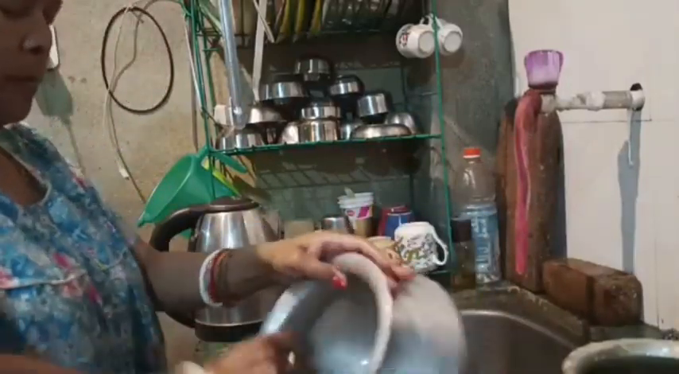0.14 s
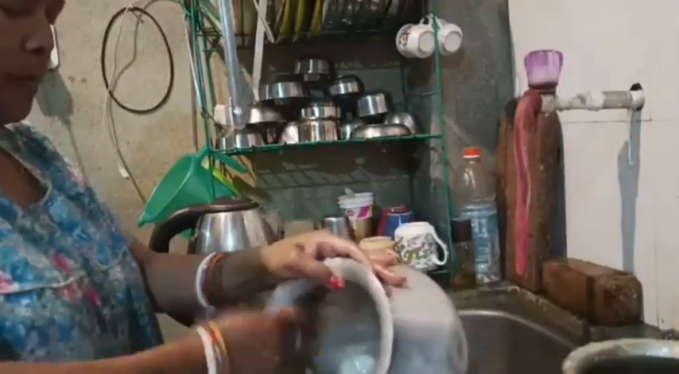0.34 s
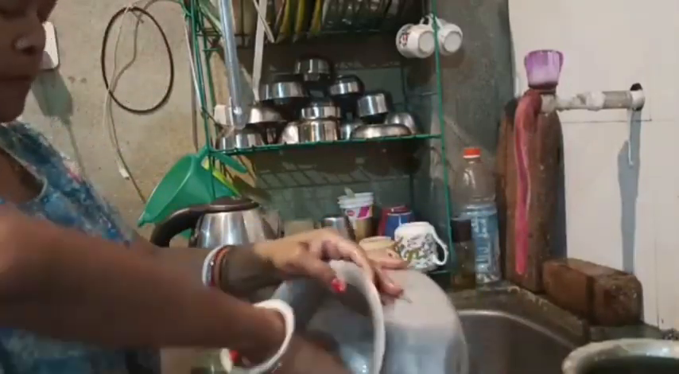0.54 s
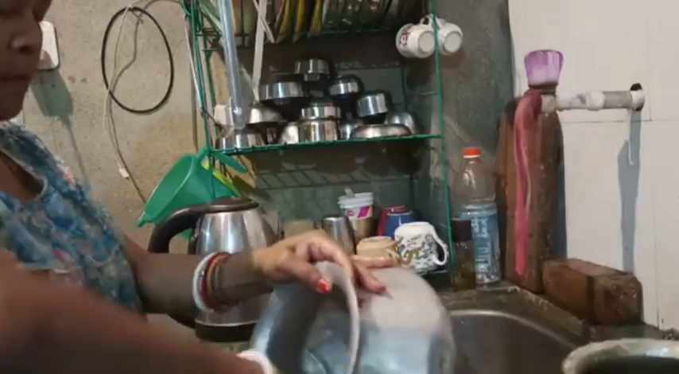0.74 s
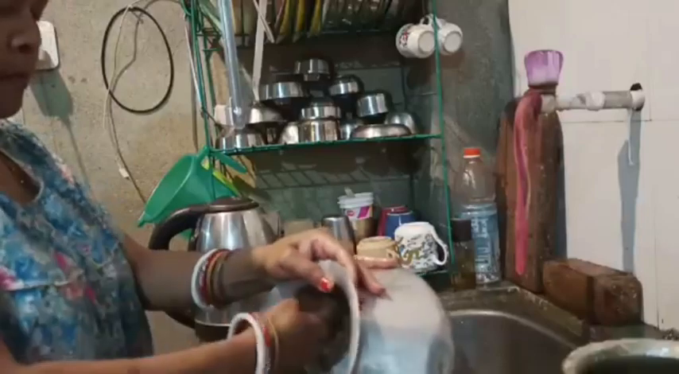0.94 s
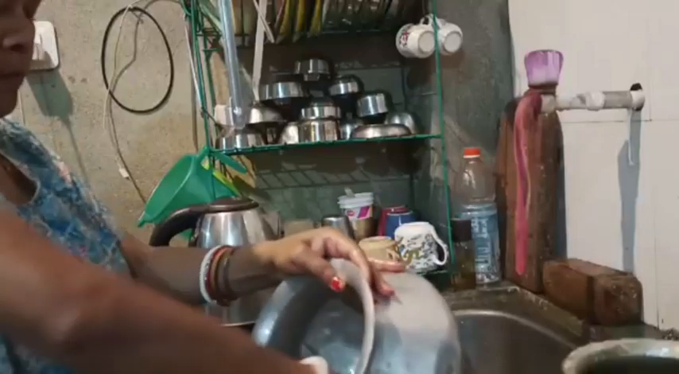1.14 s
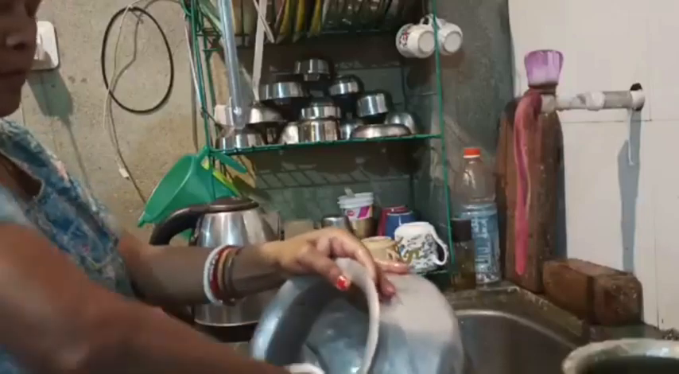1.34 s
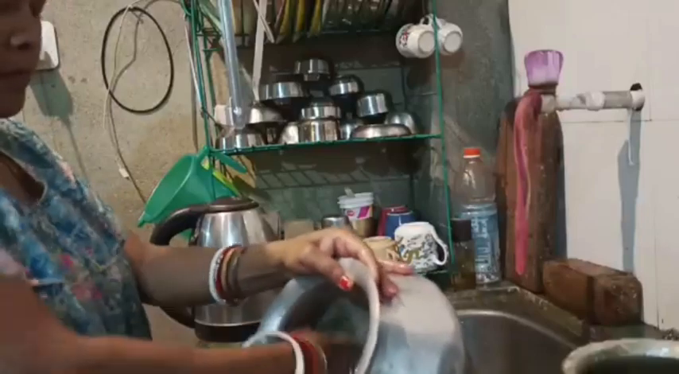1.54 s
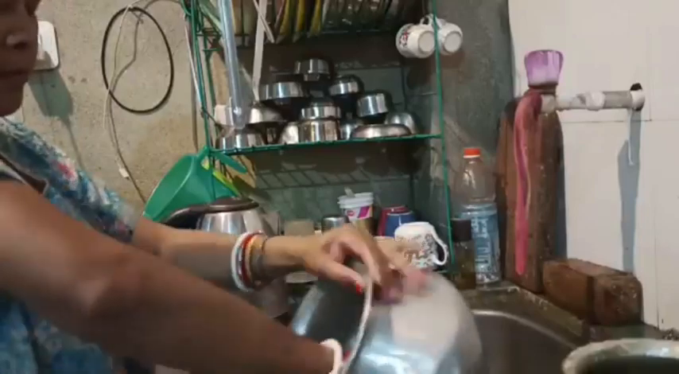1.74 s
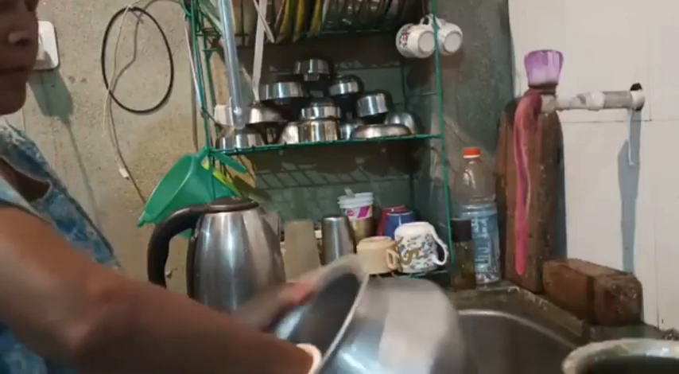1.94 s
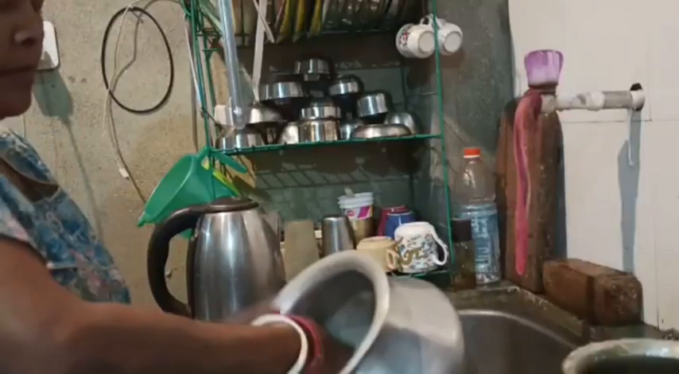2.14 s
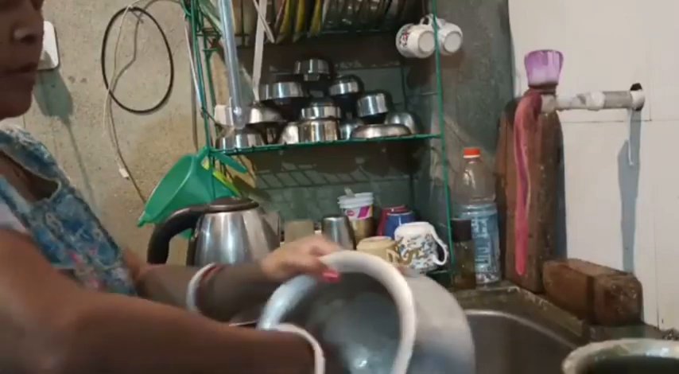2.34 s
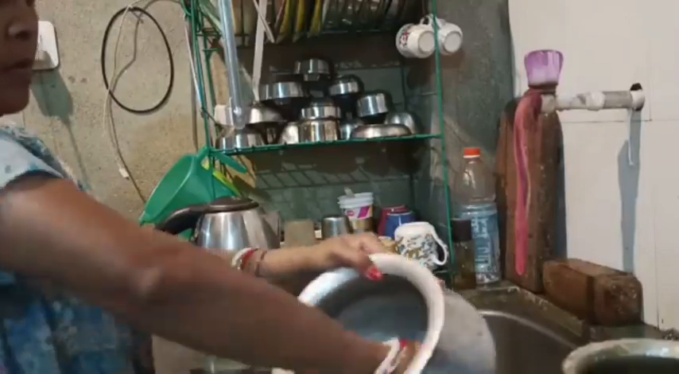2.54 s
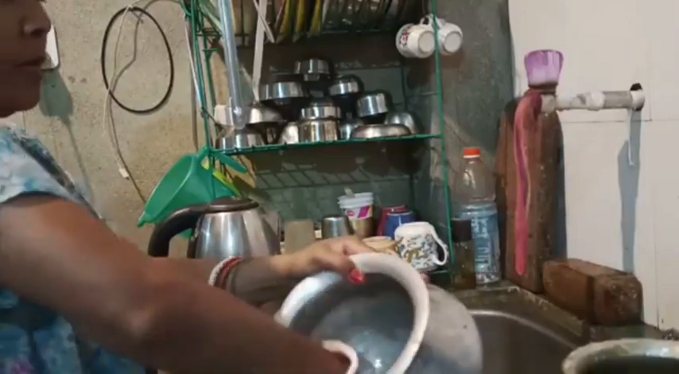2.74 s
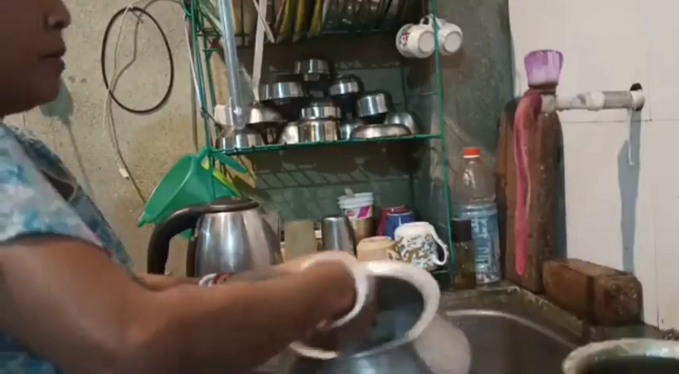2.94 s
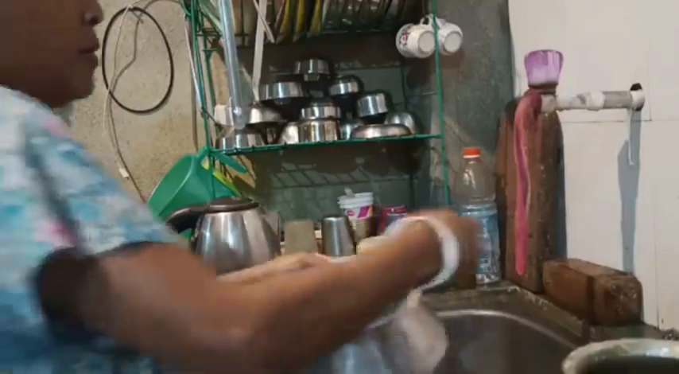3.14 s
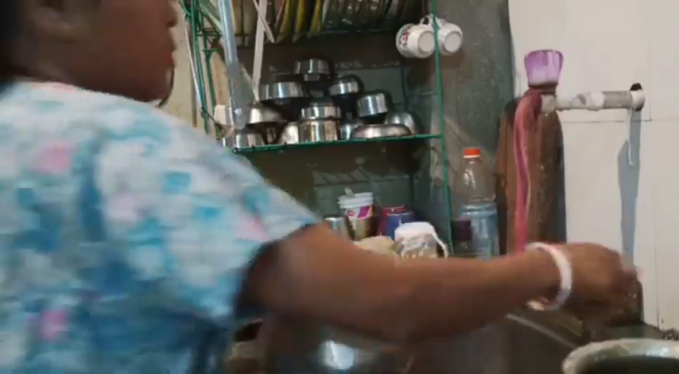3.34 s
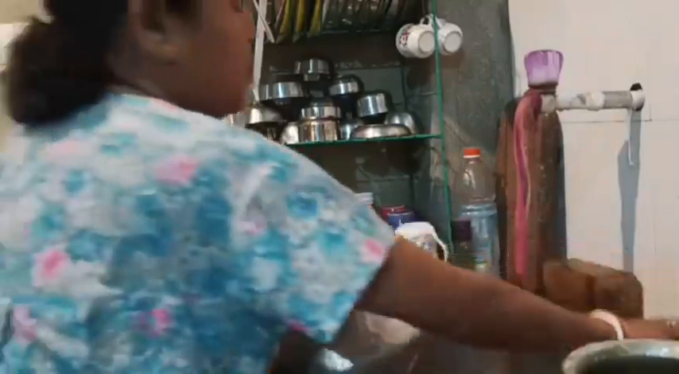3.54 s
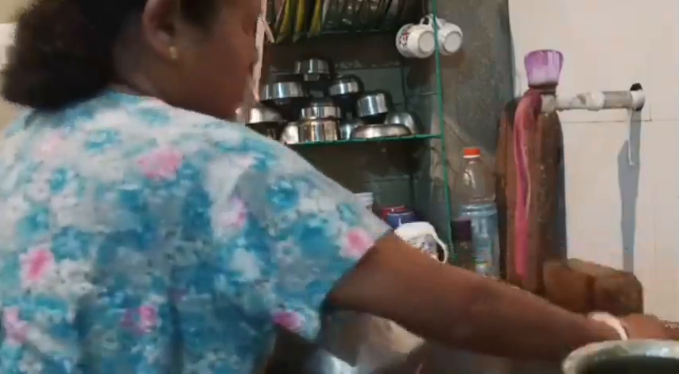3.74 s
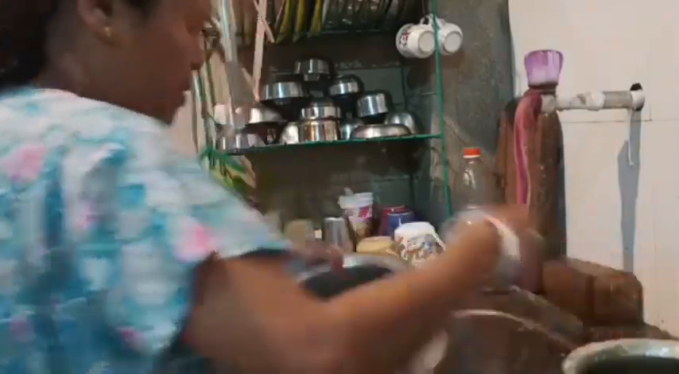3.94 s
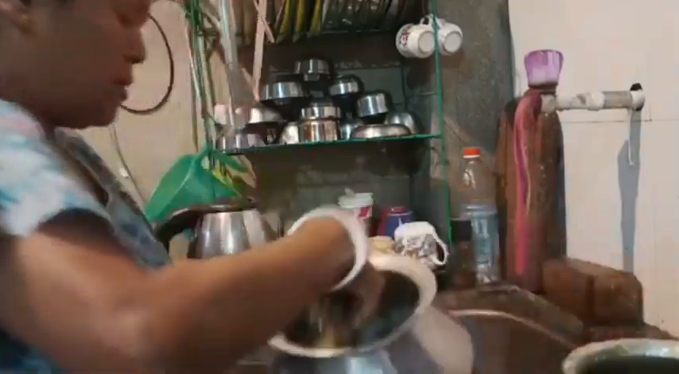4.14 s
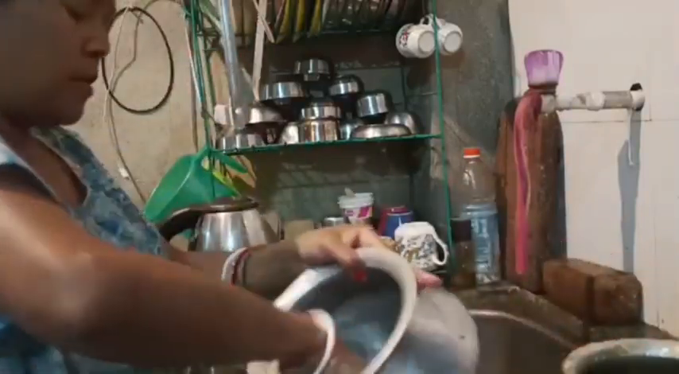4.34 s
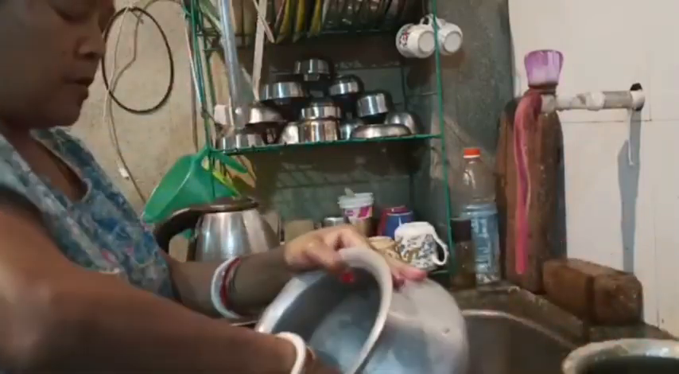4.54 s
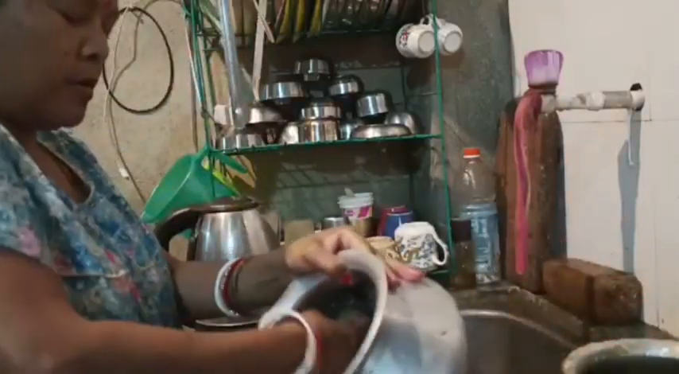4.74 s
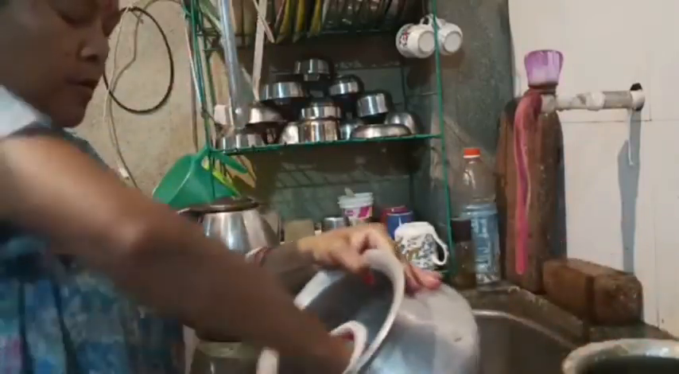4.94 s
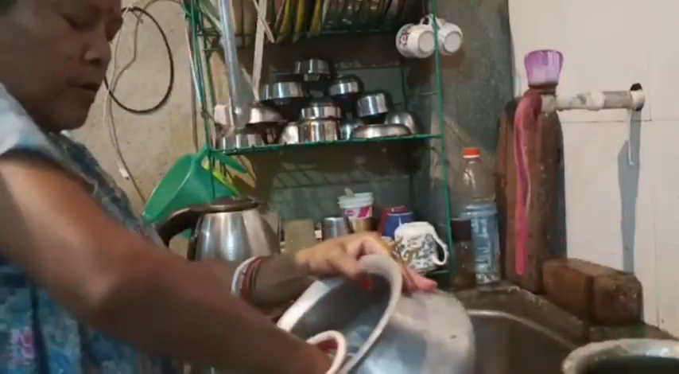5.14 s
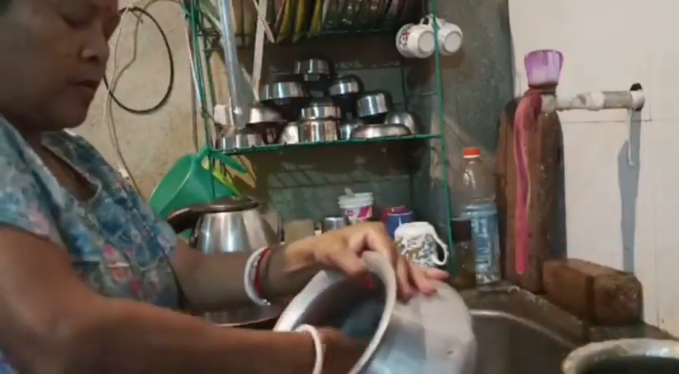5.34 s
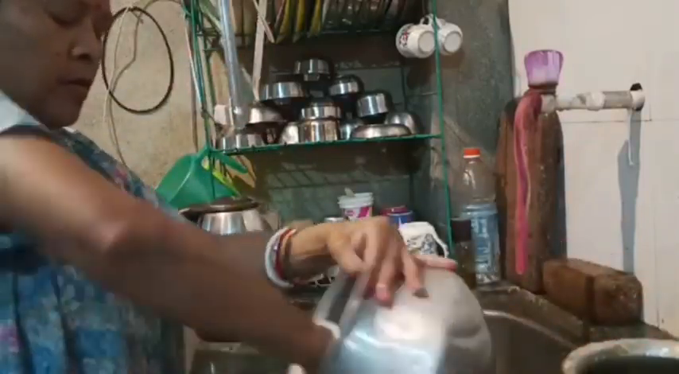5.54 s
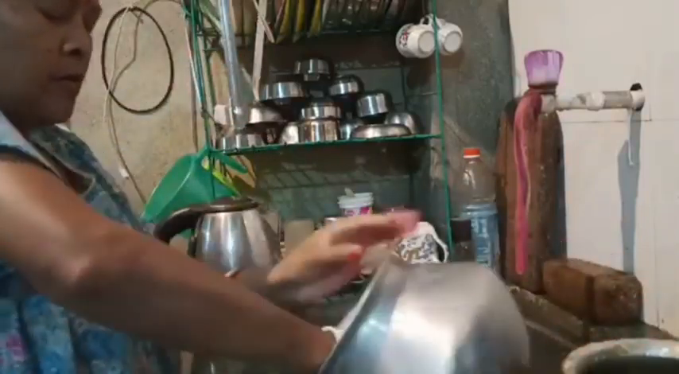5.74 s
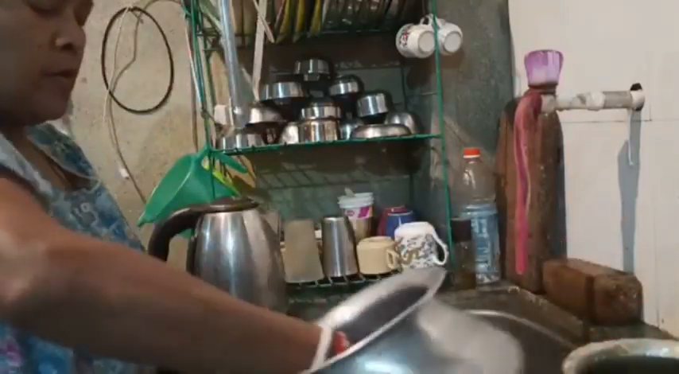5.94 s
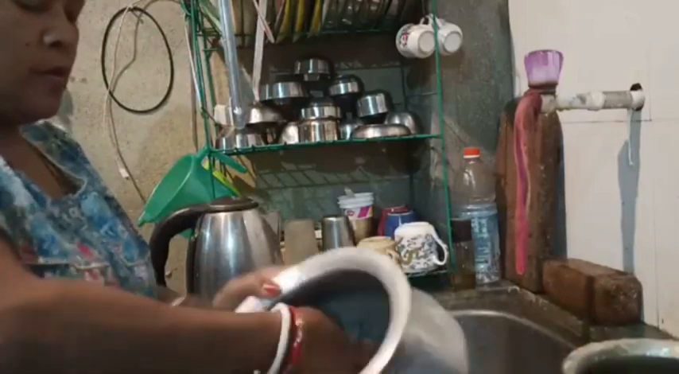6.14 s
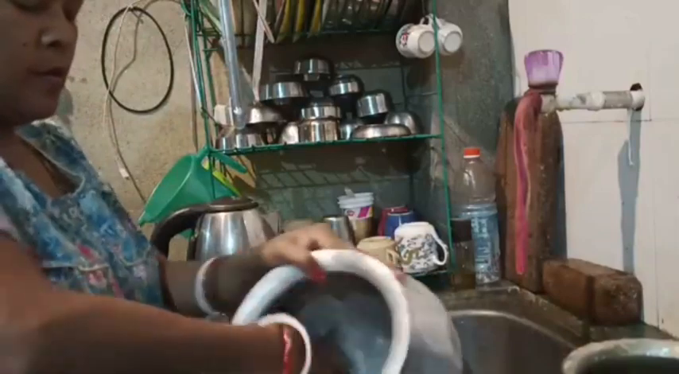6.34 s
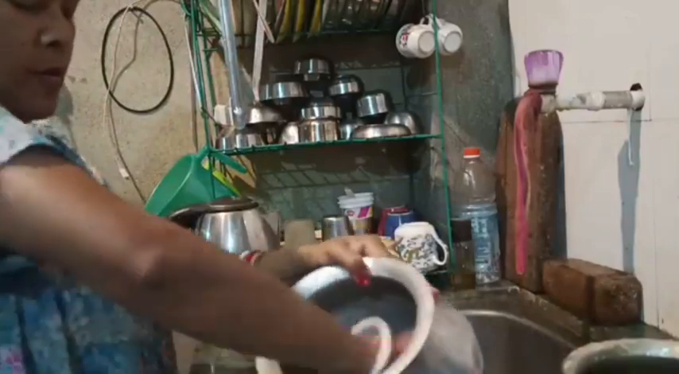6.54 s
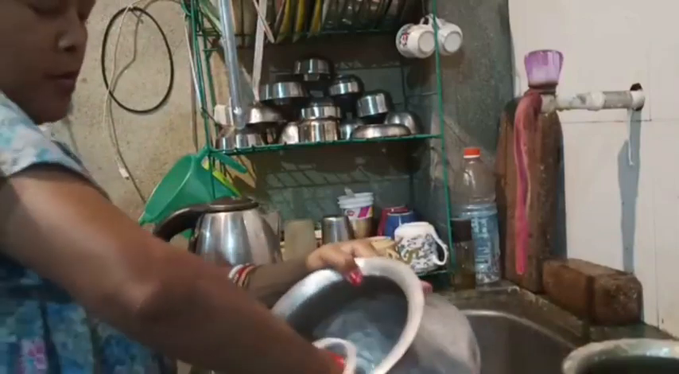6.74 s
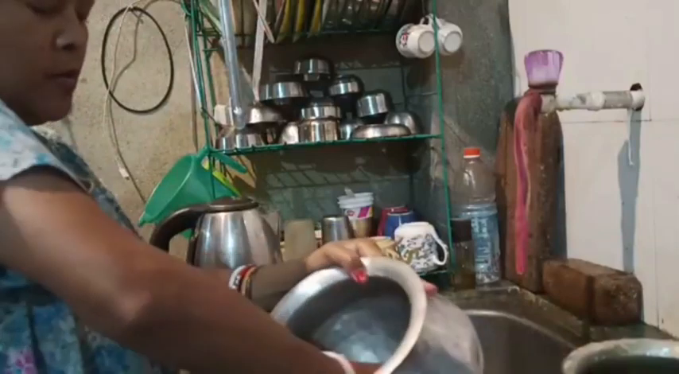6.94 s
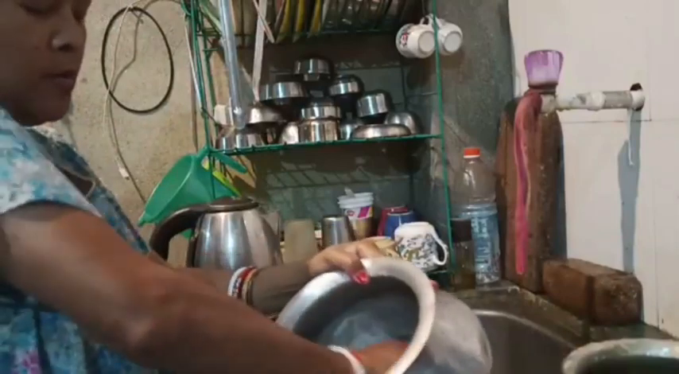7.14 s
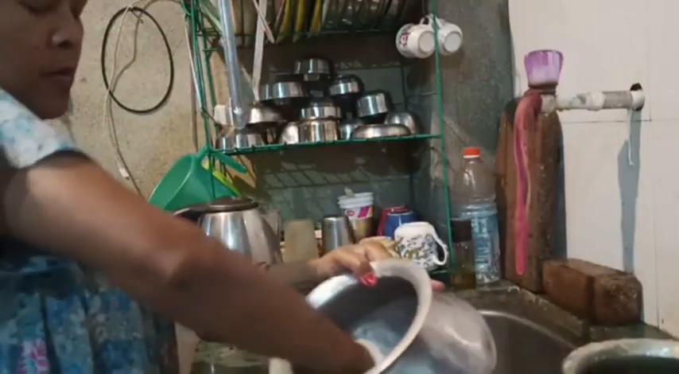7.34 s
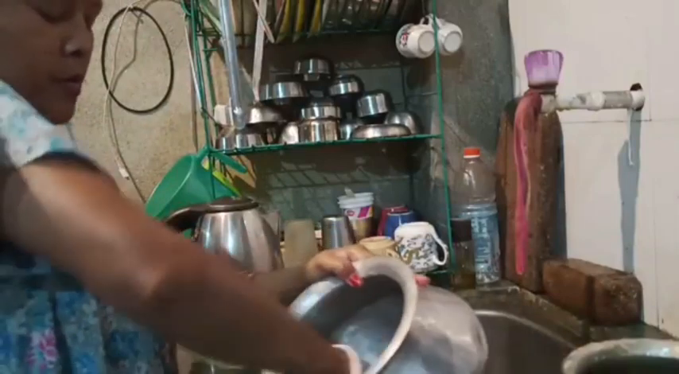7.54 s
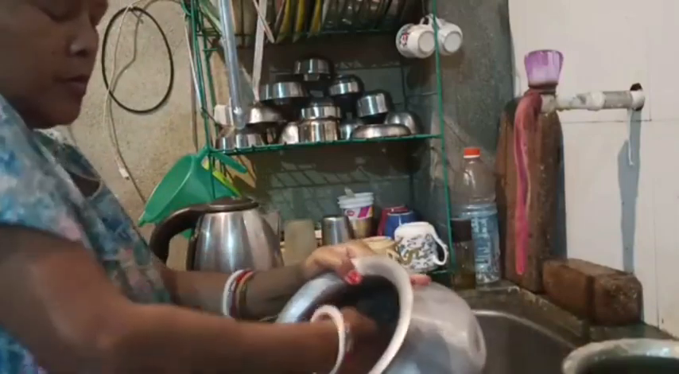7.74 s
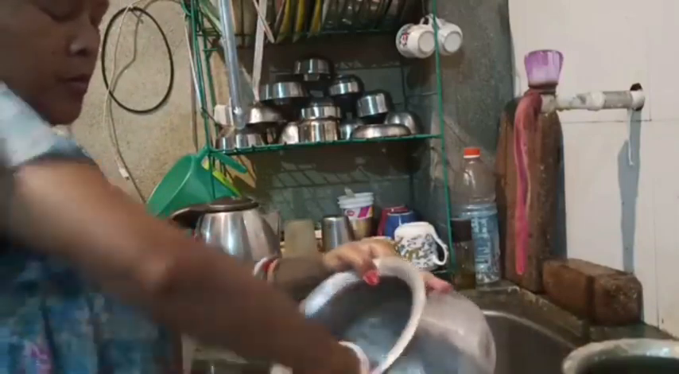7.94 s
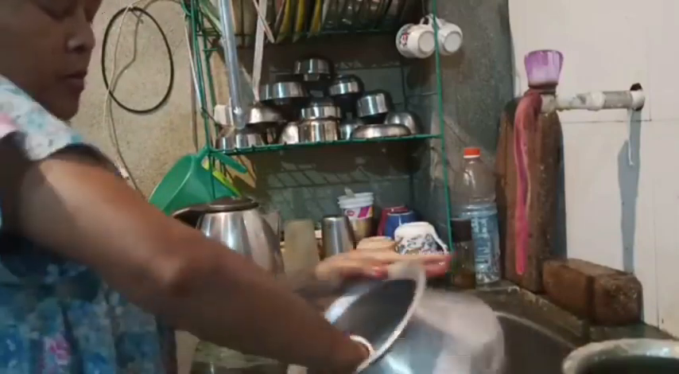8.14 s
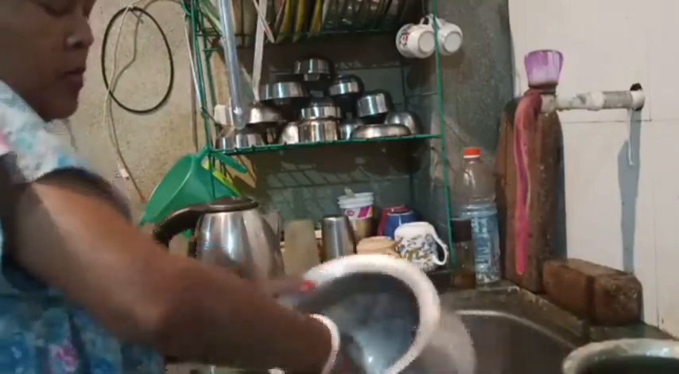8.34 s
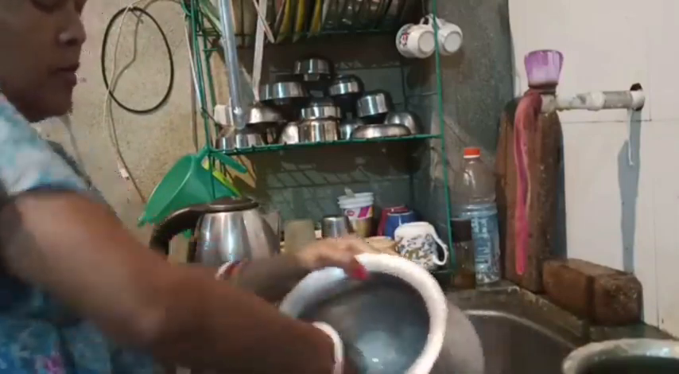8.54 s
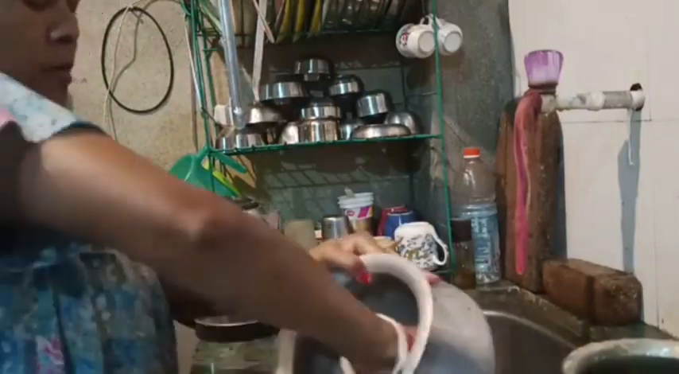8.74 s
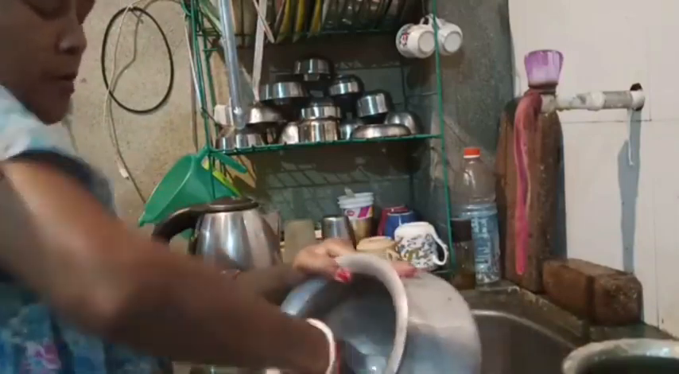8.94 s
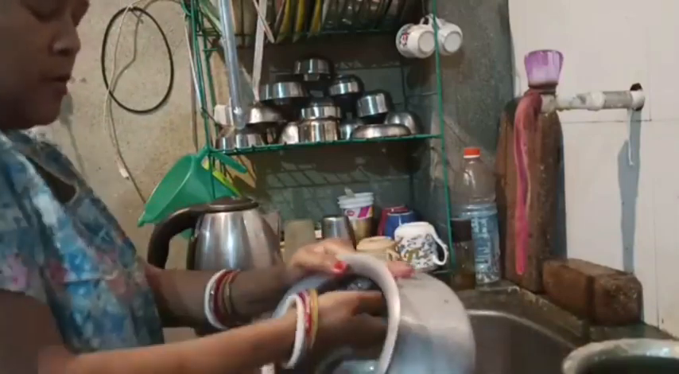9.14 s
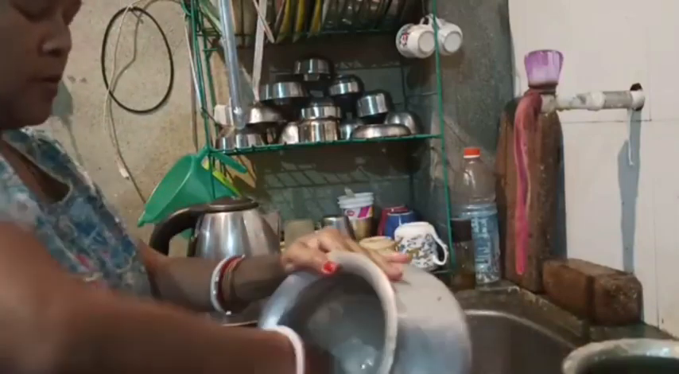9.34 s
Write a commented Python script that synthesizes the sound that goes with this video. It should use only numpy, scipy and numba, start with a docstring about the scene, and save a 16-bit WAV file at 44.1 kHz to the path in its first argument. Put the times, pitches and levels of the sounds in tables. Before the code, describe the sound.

Scouring pad hisses and grinds on a hollow metal pot that thuds and moans against the sink, bangles clinking in a small kitchen.

```python
"""A small kitchen, hard walls close by: a round metal pot is scoured by hand over a steel sink.
The scourer hisses, scratches and grinds in strokes: random stick-slip impacts ring the wall and the hollow.
The pot knocks, rolls and moans on the sink through its low modes; bangles clink on its rim and suds spit.
After some three seconds the hand reaches away for soap: about a second of quiet room, with faint rustles
and distant chirps from outside. One microphone feeds both channels."""
import sys
import numpy as np
from scipy import signal
from scipy.fft import rfft, irfft
from scipy.io import wavfile
from scipy.ndimage import uniform_filter1d
from numba import njit

SR = 44100
rng = np.random.default_rng(int(sys.argv[2]) if len(sys.argv) > 2 else 0)


def output_pcm(signal):
    """Save a mono or channel-first signal as 16-bit PCM at the path in sys.argv[1].

    Samples are clipped to [-1, 1] before scaling.
    """
    pcm = np.clip(np.atleast_2d(signal).T, -1, 1) * 32767
    wavfile.write(sys.argv[1], SR, np.round(pcm).astype(np.int16))


N = 414099
T = np.arange(N) / SR   # time [s]

# still air of the room: (frequency [Hz], relative density [dB per Hz])
AIR_SPECTRUM = [(24, -80), (40, -5), (108, 5.5), (170, 1), (325, 0), (637, -8.5), (686, -8), (1190, -15),
                (2010, -14), (2160, -15), (4680, -13), (7160, -12), (10100, -21.5), (15500, -13.5)]
# kitchen reverberation: (frequency [Hz], t60 [s])
KITCHEN_DECAY = [(100, 1), (300, 0.15), (1000, 0.28), (4000, 0.27), (8000, 0.24), (15000, 0.091)]

# scouring strokes: (fastest moment [s], rise [s], fall [s], then before the mix in scouring():
# hiss of the wet fibres [dB], scratch on the metal [dB], grind of the pressed wall [dB])
STROKES = [(.18, 0.09, 0.054, -43, -36.5, -47), (.3, 0.08, 0.12, -65, -49, -30),
           (.8, .06, 0.12, -41.5, -48, -71), (1.21, 0.019, 0.19, -33, -27, -33),
           (1.434, 0.062, 0.094, -28, -14.5, -20), (1.58, 0.12, 0.17, -40, -29.5, -29),
           (1.785, 0.077, 0.056, -23.5, -18, -18.5), (1.94, 0.18, 0.13, -54, -32, -32.5),
           (2.27, 0.14, 0.13, -39, -25, -24.5), (2.45, 0.056, 0.097, -44, -48, -25),
           (2.58, 0.16, 0.14, -28, -19.5, -24), (2.85, 0.11, 0.081, -43, -44, -30.5),
           (3.18, 0.14, 0.16, -34, -31, -64), (4.47, 0.059, 0.12, -35, -28, -53),
           (4.7, 0.095, 0.2, -30, -28, -40), (4.858, 0.021, 0.036, -33, -27.5, -23),
           (4.97, 0.056, 0.077, -27, -23.5, -20), (5.06, 0.049, 0.081, -31, -23, -22.5),
           (5.22, 0.095, 0.088, -48, -37, -29.5), (5.3, 0.11, 0.13, -27, -25, -56),
           (5.579, 0.096, 0.073, -26.5, -22, -26), (5.76, 0.079, 0.19, -59, -52, -34),
           (5.91, 0.028, 0.084, -33, -28.5, -36.5), (6.14, 0.18, .06, -47, -41, -44),
           (6.301, 0.04, 0.074, -28, -16.5, -51), (6.45, 0.08, 0.08, -28.5, -23, -20.5),
           (6.6, 0.095, 0.079, -29, -23, -21.5), (6.86, .15, 0.13, -31, -27.5, -43),
           (7.1, 0.095, 0.05, -30.5, -29, -41), (7.29, 0.075, 0.07, -27.5, -30, -44),
           (7.43, 0.055, 0.2, -32, -31.5, -35.5), (7.74, 0.19, 0.19, -31.5, -30, -48),
           (8.0, 0.072, 0.12, -28.5, -26, -29), (8.39, 0.09, 0.23, -41, -37, -60),
           (8.68, 0.18, 0.18, -31.5, -27.5, -30.5), (8.83, 0.043, 0.05, -50, -34, -32),
           (9.05, 0.16, 0.13, -27, -26.5, -42.5), (9.35, 0.056, 0.13, -28.5, -26, -35.5)]
# between strokes the pad stays lightly on the metal: (from [s], to [s], level [dB])
LIGHT_CONTACT = [(0, 1.17, -54.5), (1.21, 2.9, -45.5), (2.9, 3.22, -53.5), (4.654, 9.39, -46.5)]
# make-up of that light touch, relative to its level: (hiss [dB], scratch [dB], grind [dB])
LIGHT_TOUCH_DB = (2, 8.5, 1)
# the hollow answers more when the pad is deep inside: (time [s], relative level [dB])
PAD_DEPTH = [(0, -8), (1.8, -11), (2.5, -9), (5.0, 0.5), (5.6, -3.5), (6.5, -5.5), (7.4, -12), (8.6, -3),
             (9.39, -19)]
# colours of the wet fibres, of the grit and of the hollow: (frequency [Hz], relative density [dB per Hz])
HISS_SPECTRUM = [(4500, -22), (8000, -11), (9600, -7), (12200, -6.5), (13600, 0), (15400, 0)]
SCRATCH_SPECTRUM = [(2000, -24), (3400, -14), (4400, -4), (5400, -1), (7200, 0), (8200, 0), (9200, -9),
                    (10500, -19), (15000, -24)]
CAVITY_SPECTRUM = [(320, -20), (520, -5.5), (800, -0.5), (1050, -25.5), (1300, -2.5), (1800, -17),
                   (2400, -27), (4500, -36)]
# high modes of the pot wall: (frequency [Hz], relative level [dB], t60 that sets the clinks' ring [s])
WALL_MODES = [(1070, -11, .1), (1217, -12, .12), (1405, -12, .12), (1740, -14, .1), (2150, -14, .1),
              (2470, -9, .1), (2570, -8, .1), (2685, -2, .13), (2826, -1, .13), (3000, -2, .1),
              (3147, -1, .1), (3386, -5, .13), (3739, -5, .1), (3914, -5, .12), (4225, -1, .12),
              (4722, -3, .12), (5247, -3, .12), (5880, -2, .12), (6400, -6, .09), (7150, -3, .09),
              (7900, -2, .1)]
# low modes of the hand-damped pot on the sink: (frequency [Hz], relative level [dB], t60 before scaling [s])
BODY_MODES = [(107, -8.5, 0.97), (131.3, -7.5, 1), (184, 1, 0.13), (246, 3.5, 0.081), (313.4, 2, 0.11),
              (337.7, -2, 0.067), (346.6, -8.5, 0.33), (399, -3.5, 0.25), (530.7, -1, 0.086),
              (596, -3, 0.037), (650, -19, 0.45), (733, -11, 0.14), (860, -41, 0.19), (1184, -10, 0.066),
              (1505, -20.5, 0.15)]

# the pot is turned and its belly rolls on the sink:
# (fastest moment [s], rise [s], fall [s], relative level [dB], strongest pitch [Hz])
TURNS = [(.07, 0.066, 0.24, -37.5, 229), (.28, 0.046, 0.13, -14, 260), (1.93, 0.084, .07, -42, 300),
         (2.19, 0.19, 0.33, -23.5, 395), (2.64, 0.043, 0.1, -25.5, 296), (3.08, 0.6, 0.3, -33, 240),
         (5.4, 0.034, 0.14, -23, 287), (6.3, 0.14, 0.36, -34, 365), (8.36, 0.19, 0.47, -32.5, 295),
         (8.79, .07, 0.13, -24, 290), (9.13, 0.064, 0.086, -53, 240)]
# soapy water spits under the fingers: (time [s], peak [dB], t60 [s])
SPITS = [(.19, -16, .05), (3.38, -18, .02), (3.873, -36, .06), (4.157, -34, .06), (4.315, -25, .06),
         (4.352, -10, 0.037), (4.437, -18, .06), (4.449, -2, .06), (4.608, 0.5, 0.062), (5.899, -9, .05),
         (5.939, -12, 0.045), (6.135, -15, .06), (6.251, -15, .03), (6.725, -15, .05), (7.365, -10, .07),
         (8.384, -11.5, 0.095)]
# pot knocks on the sink: (time [s], thud peak [dB], strongest pitch [Hz],
# hardness as relative upper ring [dB], metallic crack relative to the thud [dB])
KNOCKS = [(0.195, -.5, 310, -16, -12.5), (0.234, -4, 300, -21, -23), (.255, -3, 215, -27.5, -18),
          (.29, -10.5, 256, -22.5, -31), (.634, -0.5, 312, -9, -20.5), (.883, 2, 334, -10, -18.5),
          (1.027, -10.5, 260, -5.5, -34), (1.088, -2, 322, -10.5, -18), (1.311, -24.5, 342, -15, 7),
          (2.07, 0.5, 436, -6.5, -23), (2.092, -6.5, 336, -8.5, -8), (2.429, -7, 308, -13.5, -4),
          (3.271, -16, 366, -14.5, -29), (3.342, -18.5, 393, -19, -37), (3.384, -17, 400, -23, -33),
          (4.329, -0.5, 282, -21.5, -20), (4.349, -4, 342, -10, -21), (4.716, -13.5, 364, -9, -8),
          (4.805, -17, 320, -23.5, -34), (5.236, -6.5, 305, -13.5, -6.5), (5.284, -11.5, 315, -25.5, -5),
          (5.371, -14, 288, -26.5, -25), (5.425, -19.5, 330, -29, -24), (5.921, -11.5, 357, -45.5, -30),
          (5.971, -4.5, 360, -48, -33), (6.105, -31, 380, -19, -28), (6.249, -10, 365, -16.5, -26),
          (6.275, -6, 355, -25.5, -33), (6.625, -5.5, 296, -15.5, -27), (7.138, -16.5, 272, -20.5, -13),
          (7.457, -9, 220, -19.5, -22), (7.863, -10.5, 308, -14, -15), (7.979, -10.5, 397, -12.5, -8),
          (8.18, -9, 256, -16.5, -17.5), (8.262, -6.5, 272, -22.5, -9.5), (8.471, -9, 253, -29, -14),
          (8.553, -7.5, 244, -17.5, -25), (8.724, -3, 286, -16, -24), (9.1, -22.5, 232, -28, -7)]
# metallic clash of knocks and clinks: (frequency [Hz], relative density [dB per Hz])
CLASH_SPECTRUM = [(200, 5.5), (400, 13.5), (1000, -1.5), (2000, 0), (2700, -11), (4200, 5.5), (8000, 6.5),
                  (10000, -7), (12000, -5), (14500, -10)]
# bright metallic clinks; the one at 1.369 s is the sharp start of a stroke:
# (time [s], peak [dB], favoured pitch [Hz], clash t60 before its limit [s])
CLINKS = [(.195, -11, 4930, 0.032), (0.289, -14, 3270, 0.38), (1.181, -9.5, 2220, 0.18),
          (1.219, -10.5, 2630, 0.042), (1.369, -11.5, 4730, 0.3), (1.605, -9, 3170, 0.12),
          (1.699, -11, 2680, 0.084), (2.089, -12.5, 2600, 0.17), (2.842, -6, 2970, 0.13),
          (3.382, -23, 7400, 0.014), (4.354, -10.5, 7800, 0.042), (4.45, -6.5, 6330, 0.067),
          (4.61, -8.5, 3180, 0.083), (5.406, -9.5, 2510, 0.034), (5.691, -15.5, 6660, 0.061),
          (5.745, -16, 1810, 0.25), (6.149, -10, 2920, 0.13), (6.272, -11.5, 5660, 0.12),
          (6.725, -8.5, 2880, 0.042), (6.915, -5.5, 1510, 0.041), (7.365, -5, 3580, 0.16),
          (7.549, -15.5, 4940, 0.038), (7.681, -11, 4300, 0.038), (7.991, -13, 4250, 0.091),
          (8.07, -11, 4840, 0.21), (8.261, -22.5, 6100, 0.17), (8.79, -10, 2920, 0.038)]
# the belly judders on the sink, one table per slide: (time [s], relative level [dB], pitch [Hz])
SLIDES = [
    [(1.99, -38, 259.3), (2.06, -24, 359.2), (2.17, -25.5, 349.6), (2.3, -25, 320), (2.42, -30, 339),
     (2.52, -30, 292)],
    [(2.95, -27, 235.4), (2.98, -41, 264), (3.05, -34.5, 279), (3.13, -29, 309), (3.2, -43, 318)],
    [(5.88, -24.5, 342.2), (5.93, -23.5, 321.5), (6.0, -21, 357.4), (6.05, -19, 434), (6.1, -24.5, 467),
     (6.15, -23.5, 472), (6.23, -28, 460)],
    [(6.25, -19, 370), (6.3, -12, 345.3), (6.33, -18.5, 236), (6.37, -22, 181), (6.44, -34, 151)],
    [(8.25, -44, 266.4), (8.31, -19, 308), (8.36, -18, 256.6), (8.43, -28, 276.4), (8.51, -21, 331),
     (8.56, -23, 248.7), (8.65, -27, 232)],
]
# faint falling chirps from outside: (time [s])
CHIRP_TIMES = [3.437, 3.586, 3.76, 3.92, 4.075]
# faint rustles of the reaching hand: (time [s], length [s], pitch [Hz], level before its fades [dB])
RUSTLES = [(3.5, .22, 1650, -58), (3.72, .12, 4000, -64), (3.93, .06, 4800, -52)]

# a movement has lost this much one rise time before and one fall time after its fastest moment
SWING_DB, SWING_POWER = 12.5, 1.88   # the power rounds the top
LIFT_S = 0.1   # the pad comes and goes this fast
ROCK_DB, ROCK_T60_S = -25, 0.97   # after a knock the pot rocks on, relative to that knock
NUDGE_DB, NUDGE_HZ = -18, 380   # the pressing hand stirs the belly, relative to the grind
HELD_DB, HELD_HZ = 2.5, 260   # the held pot never lies still, relative to the pad's contact
# a knock of hardness 0 dB swells this fast; twice as slowly for each such step softer
SWELL_S, SWELL_DOUBLES_DB = 0.00109, 14.5


def from_db(db):
    """Decibels to gain."""
    return 10 ** (np.asarray(db) / 20)


def rms_one(x):
    """Scale to rms 1."""
    return x / np.sqrt(np.mean(x ** 2) + 1e-20)


def unit_energy(x):
    """Scale a response so that it keeps the power of white noise."""
    return x / np.sqrt(np.sum(x ** 2) + 1e-20)


def peak_one(x):
    """Scale to peak 1."""
    return x / abs(x).max()


def in_time(rows):
    """Each column of a curve at every sample."""
    times, *columns = np.transpose(rows)
    return [np.interp(T, times, column) for column in columns]


def at_hz(points, hz):
    """Read a table on a log-frequency axis."""
    f, value = np.transpose(points)
    return np.interp(np.log(np.maximum(hz, 1)), np.log(f), value)


def add(out, s, sound):
    """Mix a sound in at time s."""
    start = max(round(s * SR), 0)
    out[start:start + len(sound)] += sound[:max(N - start, 0)]


def band_pass(x, low_hz, high_hz):
    """Keep one band of a sound."""
    return signal.sosfilt(signal.butter(2, [low_hz, high_hz], "band", fs=SR, output="sos"), x)


def colour(x, spectrum, size=2048):
    """Causal (minimum-phase) filter with the given spectrum, falling away below its first point."""
    hz = np.arange(size // 2 + 1) * SR / size
    low_fall = np.minimum((hz + 10) / spectrum[0][0], 1) ** 2
    gain = from_db(at_hz(spectrum, hz)) * low_fall
    # folding the cepstrum forward in time makes the phase minimal
    cepstrum = irfft(np.log(gain))
    cepstrum[1:size // 2] *= 2
    cepstrum[size // 2 + 1:] = 0
    response = irfft(np.exp(rfft(cepstrum)))
    return signal.fftconvolve(x, response)[:len(x)]


def drift(rate):
    """Smooth random wander of spread 1, with up to 200 new targets a second."""
    knots = rng.standard_normal(2048)
    return rms_one(np.interp(T * min(rate, 200), np.arange(len(knots)), knots))


def ring(x, hz, t60):
    """One mode: a unit click sets a decaying sine ringing from height 1."""
    r, w = from_db(-60 / (t60 * SR)), 2 * np.pi * hz / SR
    return signal.lfilter([0, np.sin(w)], [1, -2 * r * np.cos(w), r * r], x + 1e-18)


@njit
def moving_ring(x, w, r):
    """Band-pass resonance whose pitch w (radians a sample) changes as it rings."""
    out, state = np.zeros(len(x)), 0j
    for i in range(len(x)):
        state = state * r * complex(np.cos(w[i]), np.sin(w[i])) + x[i]
        out[i] = state.real
    return out


def resonate(x, hz, width_hz):
    """Pass x through a resonance that follows the pitch curve hz; rms 1."""
    return rms_one(moving_ring(x, 2 * np.pi * hz / SR, np.exp(-np.pi * width_hz / SR)))


def slips(per_s, spread_db, flutter_db):
    """Stick-slip friction: random tiny impacts of uneven size that come in clumps."""
    sizes = from_db(spread_db * np.minimum(rng.exponential(1, N), 4)) * rng.choice([-1, 1], N)
    happens = rng.random(N) < per_s / SR
    return sizes * happens * from_db(flutter_db * drift(70))


def favour(hz, centre_hz, octaves, reach_db):
    """The place of contact favours the modes near one pitch."""
    closeness = np.exp(-.5 * (np.log2(hz / centre_hz) / octaves) ** 2)
    return from_db(reach_db * (closeness - 1.5))


def swing(s, rise_s, fall_s):
    """Gain of one hand movement: it speeds up to its fastest moment and slows again."""
    away = np.maximum((s - T) / rise_s, (T - s) / fall_s)
    gain, near = np.zeros(N), away < 4
    gain[near] = from_db(-SWING_DB * away[near] ** SWING_POWER)
    return gain


def room_air(level_db=-50):
    """The quiet room: steady noise in the colour of its air, at one rms level."""
    return from_db(level_db) * rms_one(colour(rng.standard_normal(N), AIR_SPECTRUM))


def kitchen(x, build_s=0.0043):
    """Dense reflections off hard, close walls: the lowest band lasts longest, the highest dies soonest."""
    t, tail = T[:SR], 0
    edges = np.geomspace(60, 16000, 9)
    for low, high in zip(edges, edges[1:]):
        band = band_pass(rng.standard_normal(len(t)), low, high)
        tail = tail + band * from_db(-60 * t / at_hz(KITCHEN_DECAY, np.sqrt(low * high)))
    build_up = 1 - np.exp(-(t / build_s) ** 2)
    return signal.fftconvolve(x, unit_energy(tail * build_up))[:N]


def contact():
    """Gain of the pad's light touch, for as long as the hand is at the pot."""
    touches = []
    for start, end, db in LIGHT_CONTACT:
        lift = np.clip(np.minimum(T - start, end - T) / LIFT_S + 1, 0, 1) ** 2
        touches.append(from_db(db) * lift)
    return np.max(touches, axis=0)


def hand_work():
    """Gains of hiss, scratch and grind: the powers of the strokes add to the light touch."""
    touch = contact()
    power = [(from_db(db) * touch) ** 2 for db in LIGHT_TOUCH_DB]
    for s, rise_s, fall_s, *levels_db in STROKES:
        stroke = swing(s, rise_s, fall_s) ** 2
        power = [p + from_db(db) ** 2 * stroke for p, db in zip(power, levels_db)]
    return np.sqrt(power)


def pot_wall(x, shade_db=4.5, detune=0.019, width_share=0.029):
    """Friction rings the wall; the soft travelling pad damps, detunes and shades each mode."""
    out = 0
    for hz, db, _ in WALL_MODES:
        # modes above 3500 Hz are held down further
        shaded_db = shade_db * drift(13) - 7 * np.clip(np.log2(hz / 3500), 0, 1.2)
        mode = resonate(x, hz * (1 + detune * drift(13)), width_share * hz)
        out = out + from_db(db + shaded_db) * mode
    # the modes share out the power that the hand puts in, so the level stays even
    return rms_one(out / np.sqrt(uniform_filter1d(out ** 2, size=2048) + 1e-9))


def inside_pot(x, echo_share=0.32, wander_share=0.0696):
    """Echoes off the curved wall change their delay as the hand moves, so the colour keeps shifting."""
    out = x
    for delay_s in (.0011, .0019, .0034):
        delay = delay_s * (1 + wander_share * drift(7))
        # each echo repeats the direct sound
        out = out + echo_share * np.interp(T - delay, T, x)
    return rms_one(out)


def scouring(hiss, scratch, grind, hiss_db=4.0, scratch_db=-2.5, grind_db=-1.4, hollow_db=-7.0):
    """Light strokes mostly hiss; pressed ones scratch, ring the wall and fill the hollow."""
    depth_db, = in_time(PAD_DEPTH)
    # the pad catches and lets go
    catching = rms_one(from_db(1.3 * drift(30) + .9 * drift(110)))
    squelch = from_db(2.0 * drift(30))
    fibres = slips(per_s=12000, spread_db=1.0, flutter_db=-3.5) * squelch
    grit = slips(per_s=4600, spread_db=3.0, flutter_db=-1.26)
    pressed = slips(per_s=5000, spread_db=1.5, flutter_db=1.5)
    out = hiss * from_db(hiss_db) * rms_one(colour(fibres, HISS_SPECTRUM))
    out += scratch * from_db(scratch_db) * inside_pot(colour(grit, SCRATCH_SPECTRUM))
    out += grind * from_db(grind_db) * inside_pot(pot_wall(pressed))
    out += grind * from_db(depth_db + hollow_db) * inside_pot(colour(grit, CAVITY_SPECTRUM))
    return catching * out


def belly_motion(grind):
    """Gain and pitch of the rolling: powers of turns, rocking and pushing add; the pitch is their mean."""
    moves = [(from_db(db) * swing(s, rise_s, fall_s), hz) for s, rise_s, fall_s, db, hz in TURNS]
    moves += [(from_db(NUDGE_DB) * grind, NUDGE_HZ), (from_db(HELD_DB) * contact(), HELD_HZ)]
    power = sum(gain ** 2 for gain, hz in moves) + 1e-12
    weighted = sum(gain ** 2 * hz for gain, hz in moves) + 1e-12 * HELD_HZ
    rocking = from_db(ROCK_DB - 60 * T[:SR] / ROCK_T60_S) ** 2
    for s, db, hz, *_ in KNOCKS:
        add(power, s, from_db(db) ** 2 * rocking)
        add(weighted, s, from_db(db) ** 2 * rocking * hz)
    # weighting by power lets the strongest movement lead the pitch
    return np.sqrt(power), weighted / power


def rolling(grind, level_db=-3.5, reach_db=15, ring_share=2.08):
    """Dents and ridges bump the low modes as the pot is turned."""
    level, pitch = belly_motion(grind)
    bumps = np.diff(slips(per_s=1500, spread_db=1.5, flutter_db=2.25), prepend=0)
    out, power = 0, 0
    for hz, db, t60 in BODY_MODES:
        gain = from_db(db) * (favour(hz, pitch, octaves=0.43, reach_db=reach_db) + from_db(-26))
        out = out + gain * rms_one(ring(bumps, hz, ring_share * t60))
        power = power + gain ** 2
    return level * from_db(level_db) * out / np.sqrt(power)


def spits(hold_s=.004):
    """A thin film of suds bursts: a short, very bright spray of tiny crackles."""
    out, t = np.zeros(N), T[:SR // 8]
    for s, db, t60 in SPITS:
        fade = from_db(-60 * np.maximum(t - hold_s, 0) / t60)
        spray = colour(rng.laplace(size=len(t)) * fade, HISS_SPECTRUM)
        add(out, s, from_db(db) * peak_one(spray))
    return out


def knocks(upper_db=25.0, crack_t60=0.084, damping=0.23, linger_db=-19, linger_t60=1.0):
    """A blunt blow swells into the low modes; a hard one spreads over more of them; a short crack is added."""
    out, t = np.zeros(N), T[:SR // 3]
    # a small pot radiates the deepest part of the push poorly
    radiation = signal.butter(1, 130, "high", fs=SR, output="sos")
    for s, db, pitch, upper, crack_db in KNOCKS:
        thud, swell_s = 0, SWELL_S * 2 ** (-upper / SWELL_DOUBLES_DB)
        reach_db = 5.5 + 6 * swell_s / SWELL_S
        for hz, mode_db, t60 in BODY_MODES:
            hardness = np.clip(np.log2(hz / 400) * 2, 0, 1)
            chance_db = rng.normal(0, 2)
            gain = from_db(mode_db + hardness * (upper + upper_db) + chance_db)
            gain = gain * favour(hz, pitch, octaves=0.24, reach_db=reach_db)
            # the modes pull together at the height of the push
            wave = np.sin(2 * np.pi * hz * (1 + rng.normal(0, 0.011)) * (t - swell_s))
            # the hand stops most of the ring at once; a little of the belly's note lingers
            stopped = from_db(-60 * t / (t60 * damping))
            linger = from_db(linger_db - 60 * t / linger_t60) * favour(hz, pitch, octaves=0.5, reach_db=36)
            thud = thud + gain * wave * (stopped + linger)
        thud = signal.sosfilt(radiation, thud * (1 - np.exp(-(t / swell_s) ** 2)))
        crack = colour(rng.standard_normal(len(t)) * from_db(-60 * t / crack_t60), CLASH_SPECTRUM)
        add(out, s, from_db(db) * (peak_one(thud) + from_db(crack_db) * peak_one(crack)))
    return out


def clinks(chatter_s=0.0012, detune=0.0051, ring_share=0.62, clash_db=-0.5, longest_clash_s=.15):
    """Brief chatter on the metal, mostly bangles on the rim: wall modes ring over a clash of dying noise."""
    out, t = np.zeros(N), T[:SR // 3]
    for s, db, pitch, clash_t60 in CLINKS:
        chatter = rng.standard_normal(len(t)) * np.exp(-t / chatter_s)
        tone = 0
        for hz, mode_db, t60 in WALL_MODES:
            gain = from_db(mode_db) * favour(hz, pitch, octaves=.45, reach_db=13)
            ring_t60 = ring_share * np.sqrt(t60 * clash_t60)
            tone = tone + gain * ring(chatter, hz * (1 + rng.normal(0, detune)), ring_t60)
        fade = from_db(-60 * t / min(clash_t60, longest_clash_s))
        clash = colour(rng.standard_normal(len(t)) * fade, CLASH_SPECTRUM)
        clink = unit_energy(tone) + from_db(clash_db) * unit_energy(clash)
        add(out, s, from_db(db) * peak_one(clink))
    return out


def groans(note_hz=365., note_width_hz=140):
    """Sticking and slipping repeats almost regularly, so a slide moans at a rough, bending pitch."""
    out, wobble, swell = np.zeros(N), .085 * drift(150), rms_one(from_db(3 * drift(70)))
    note = np.full(N, note_hz)
    for rows in SLIDES:
        level_db, pitch = in_time(rows)
        sliding = uniform_filter1d(1. * ((T > rows[0][0]) & (T < rows[-1][0])), size=600)
        phase = 2 * np.pi * np.cumsum(pitch * (1 + wobble)) / SR
        moan = swell * (np.sin(phase) + from_db(-17) * np.sin(2 * phase))
        # irregular slips wake the belly's own note beside it
        woken = resonate(rng.standard_normal(N), note, note_width_hz)
        belly = .6 * resonate(woken, note, note_width_hz)
        out += sliding * from_db(level_db) * (moan + belly)
    return out


def chirps(level_db=-53.0, start_hz=3200, fall_hz=330, length_s=0.039):
    """A row of small chirps from outside: short sines that fall in pitch."""
    out, t = np.zeros(N), T[:int(length_s * SR)]
    for s in CHIRP_TIMES:
        phase = 2 * np.pi * np.cumsum(start_hz - fall_hz * t / length_s) / SR
        add(out, s, from_db(level_db) * np.sin(phase) * np.hanning(len(t)))
    return out


def rustles():
    """Soft rustles of the reaching hand: brief narrow bands of noise that fade in and out."""
    out = np.zeros(N)
    for s, length_s, hz, db in RUSTLES:
        noise = rms_one(band_pass(rng.standard_normal(int(length_s * SR)), hz / 1.12, hz * 1.07))
        add(out, s, from_db(db) * noise * np.hanning(len(noise)) ** .5)
    return out


def scene(knock_room_db=-4.5, clink_room_db=-4.5, rub_room_db=-12.0):
    """Pot and room reach one microphone, the same in both channels; each source sends its share to the room."""
    air = room_air()
    hiss, scratch, grind = hand_work()
    rub = scouring(hiss, scratch, grind) + rolling(grind) + groans() + chirps() + rustles()
    bright = spits() + clinks()
    knock = knocks()
    sent = from_db(rub_room_db) * rub + from_db(knock_room_db) * knock + from_db(clink_room_db) * bright
    return np.tile(rub + knock + bright + kitchen(sent) + air, (2, 1))


def record(dry, bass_hz=75, cutoff_hz=15550):
    """The microphone thins the bass, peaks are rounded, the top is cut."""
    thin = signal.sosfilt(signal.butter(3, bass_hz, "high", fs=SR, output="sos"), dry)
    steep = signal.ellip(12, .1, 80, cutoff_hz, fs=SR, output="sos")
    return signal.sosfilt(steep, np.tanh(thin))


dry = scene()
out = record(dry)
output_pcm(out)
```